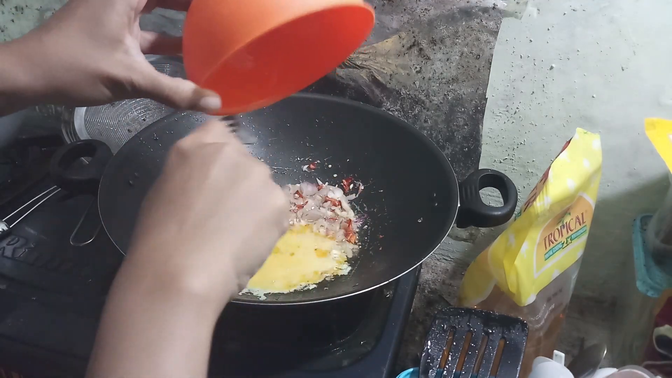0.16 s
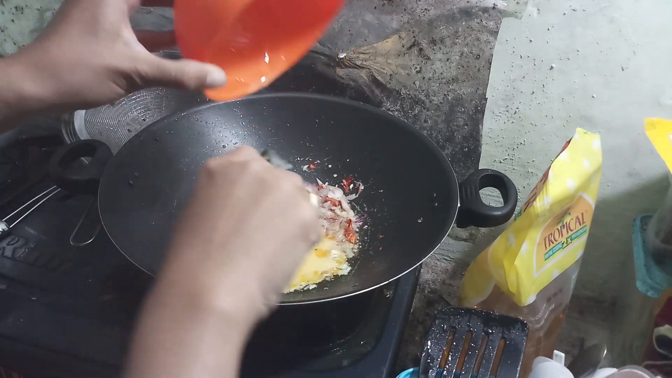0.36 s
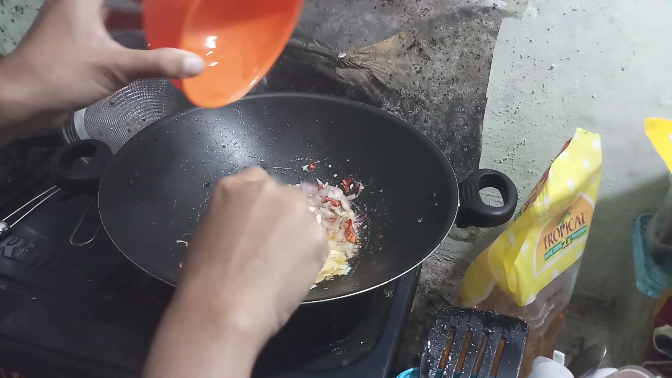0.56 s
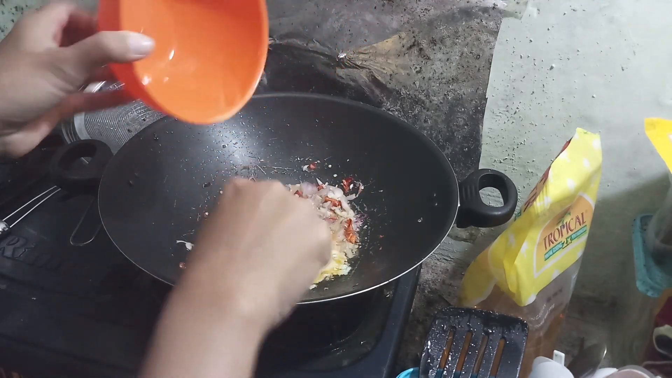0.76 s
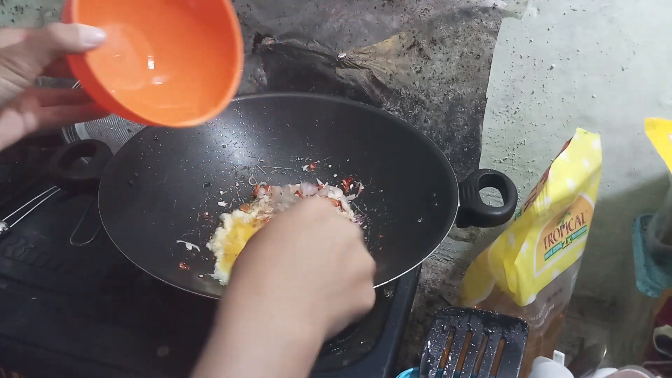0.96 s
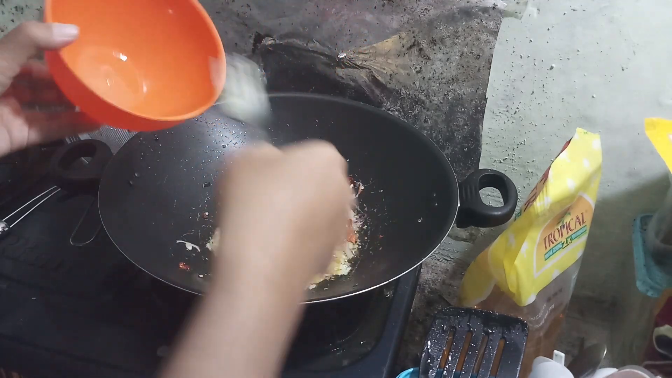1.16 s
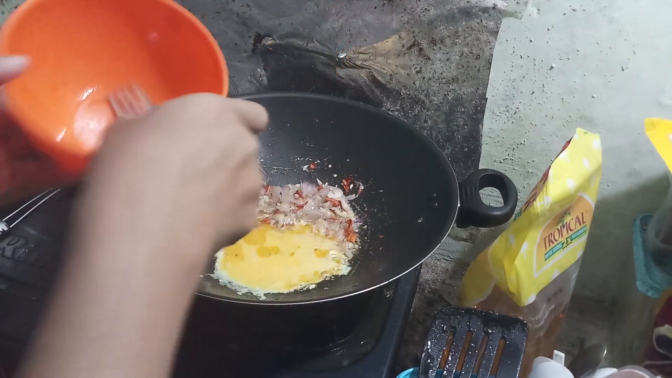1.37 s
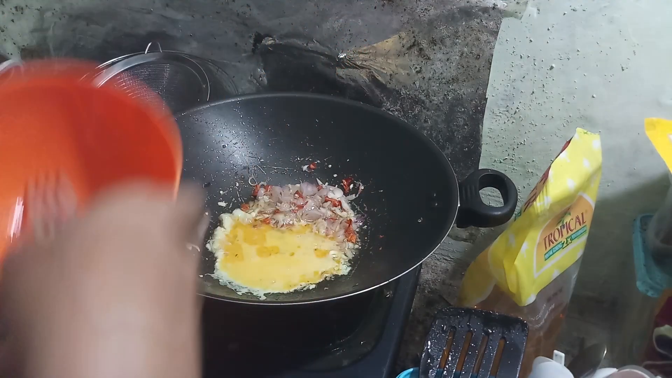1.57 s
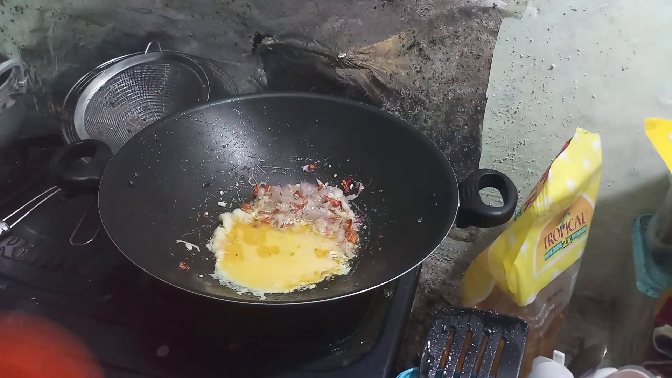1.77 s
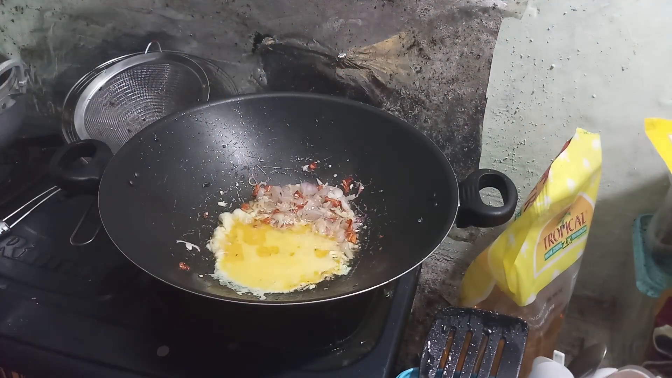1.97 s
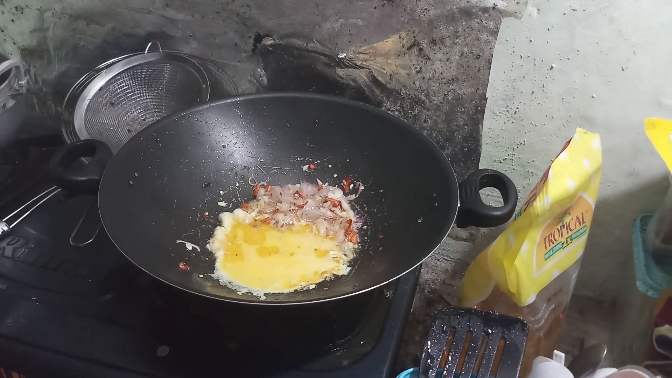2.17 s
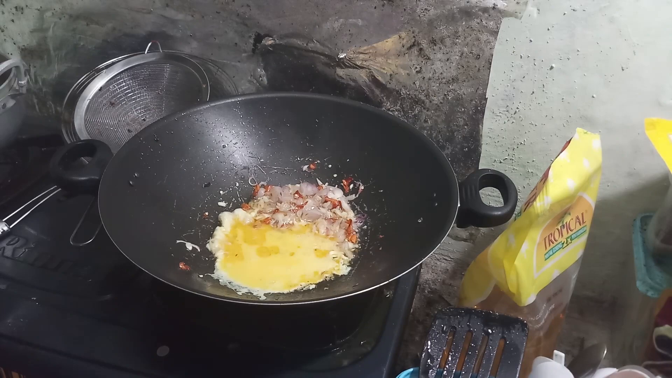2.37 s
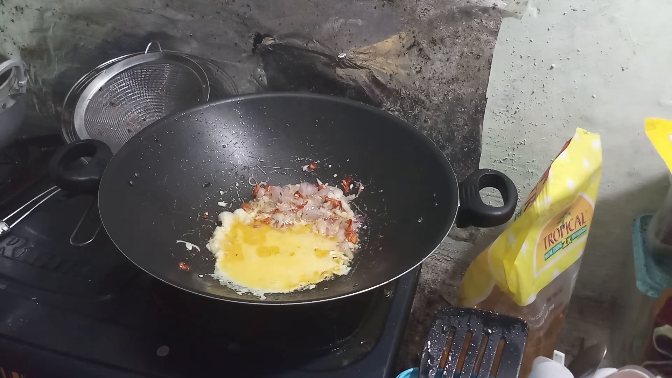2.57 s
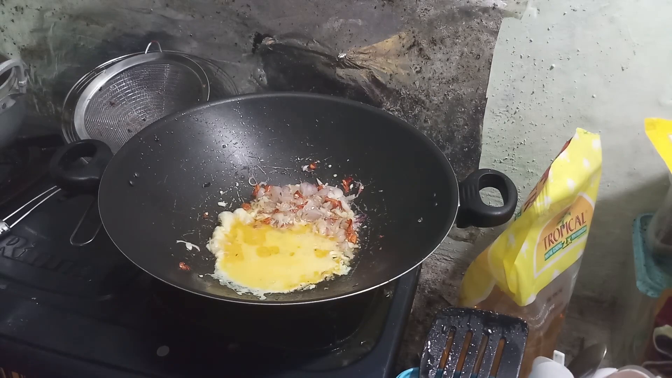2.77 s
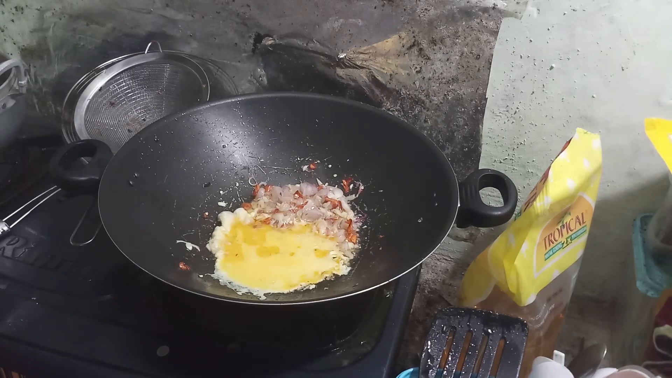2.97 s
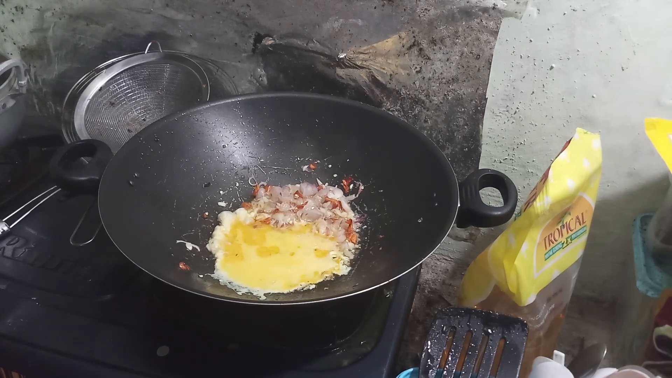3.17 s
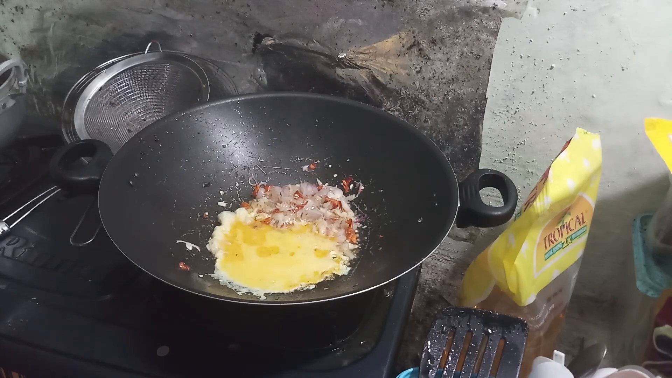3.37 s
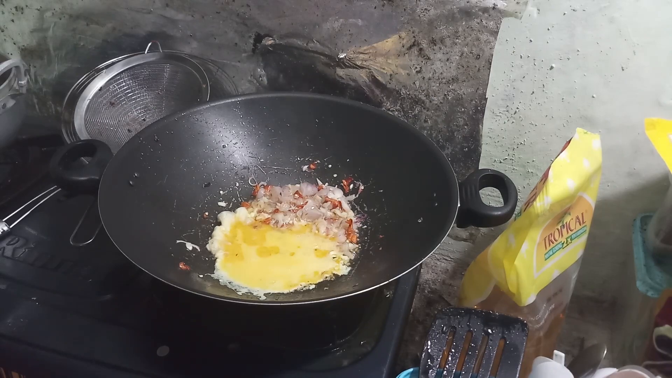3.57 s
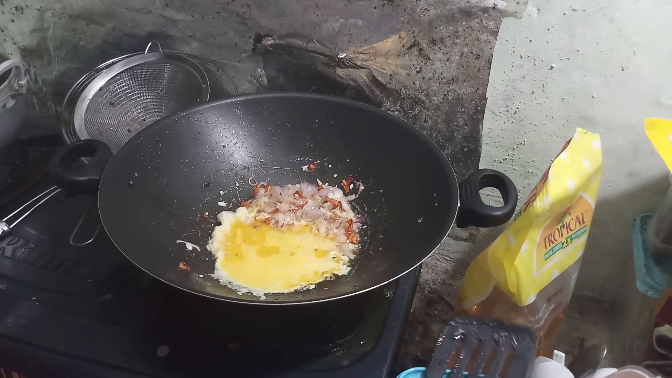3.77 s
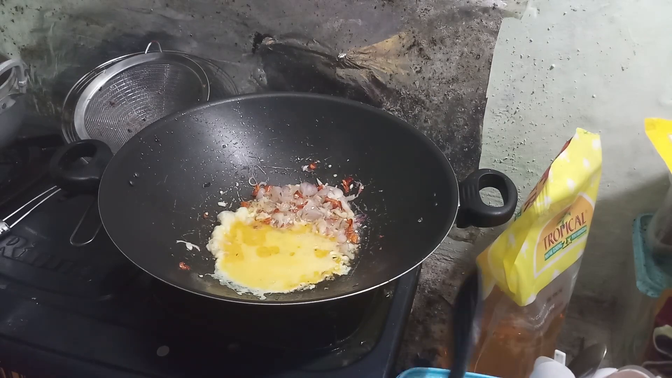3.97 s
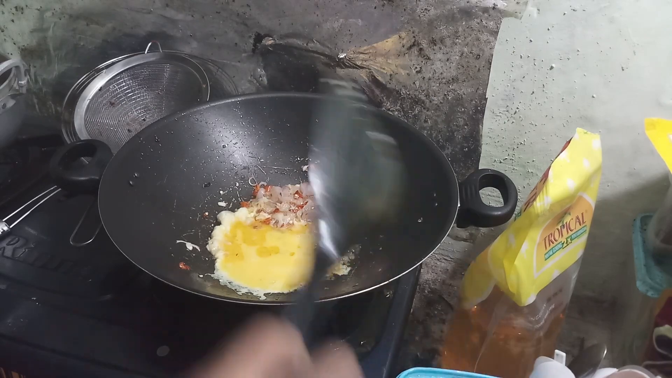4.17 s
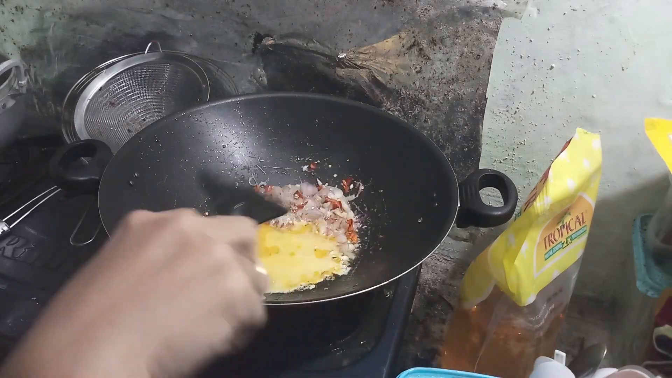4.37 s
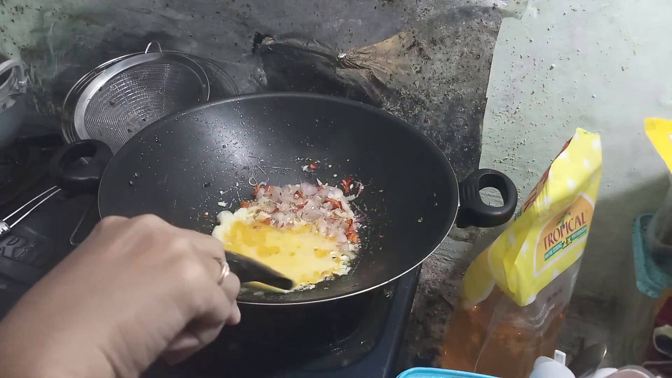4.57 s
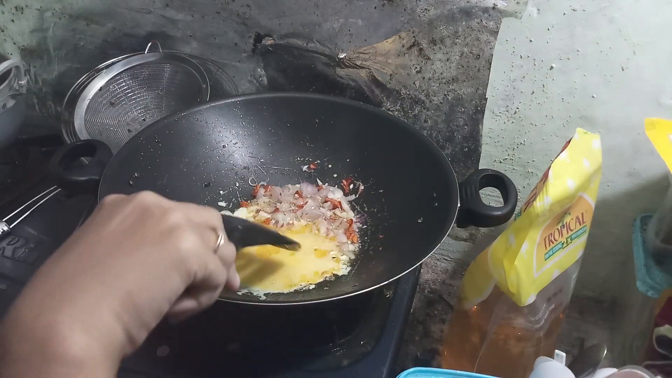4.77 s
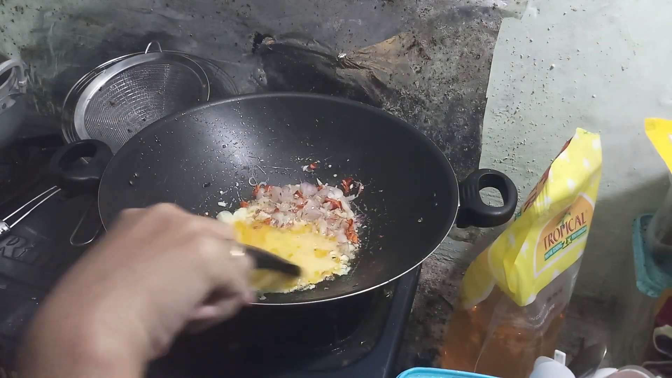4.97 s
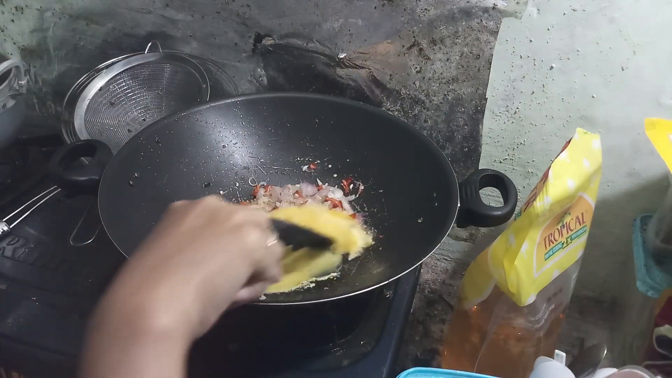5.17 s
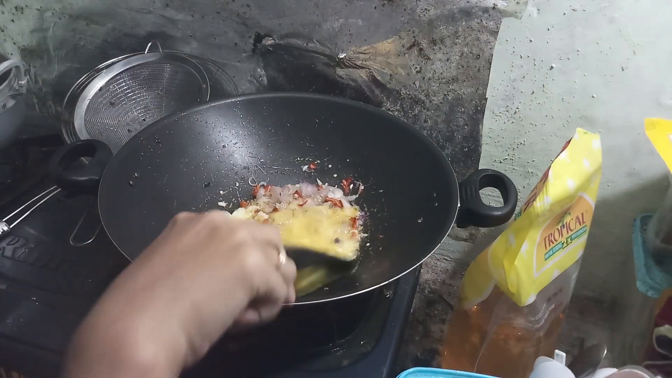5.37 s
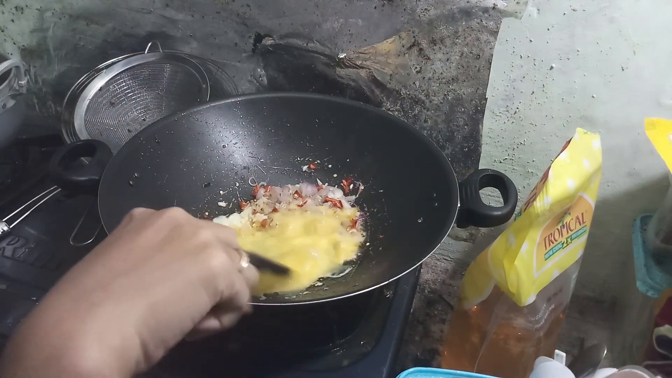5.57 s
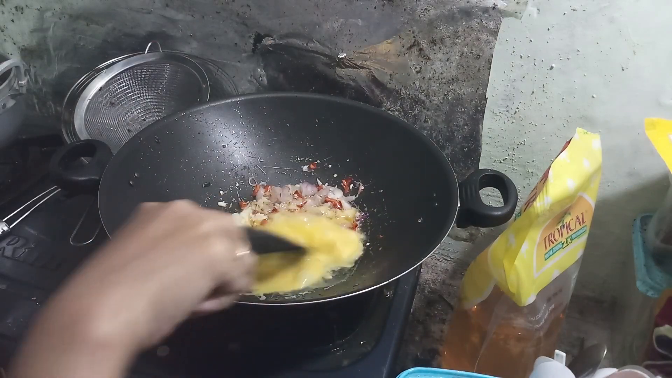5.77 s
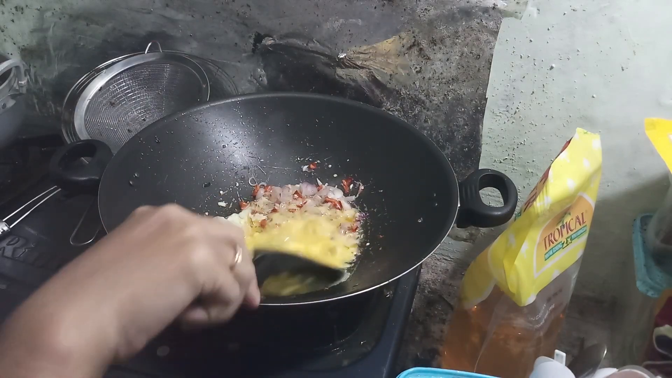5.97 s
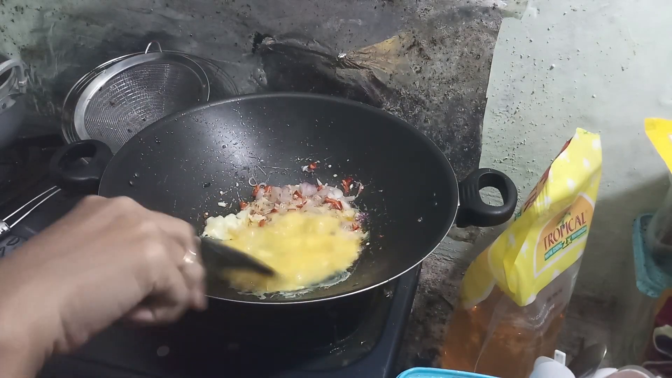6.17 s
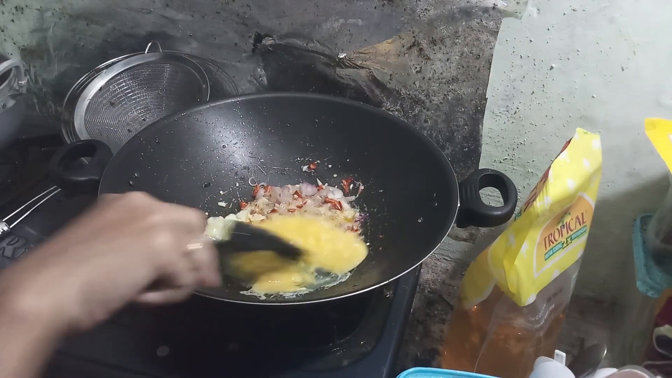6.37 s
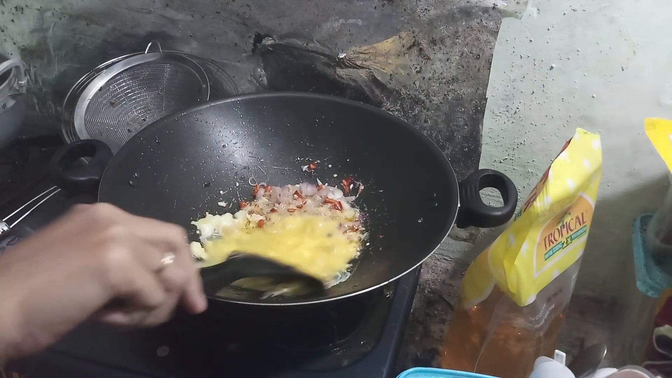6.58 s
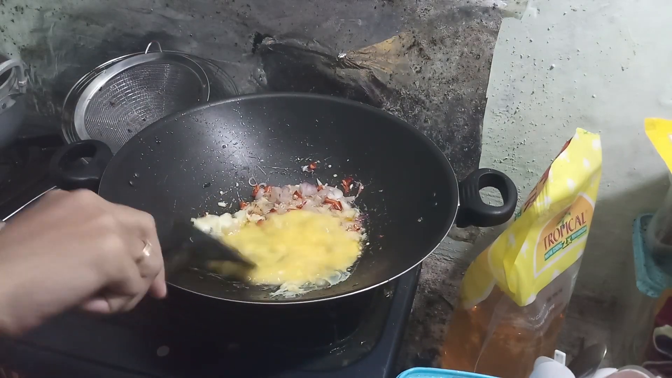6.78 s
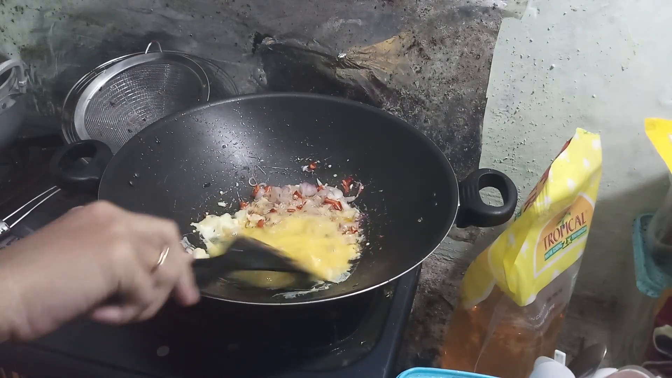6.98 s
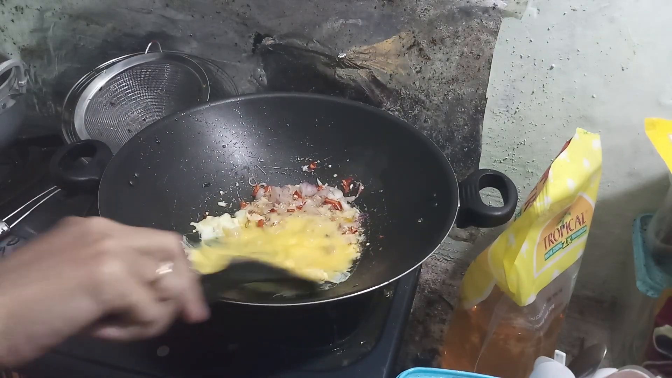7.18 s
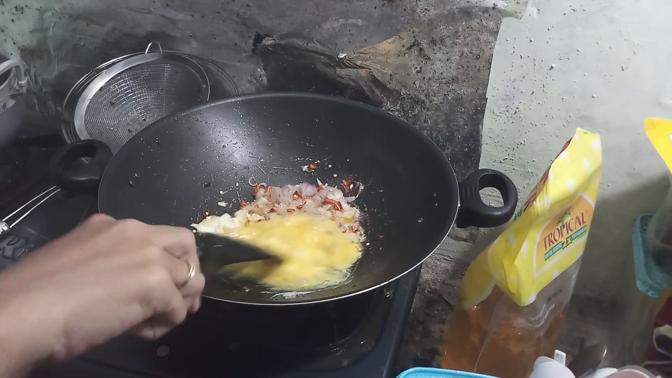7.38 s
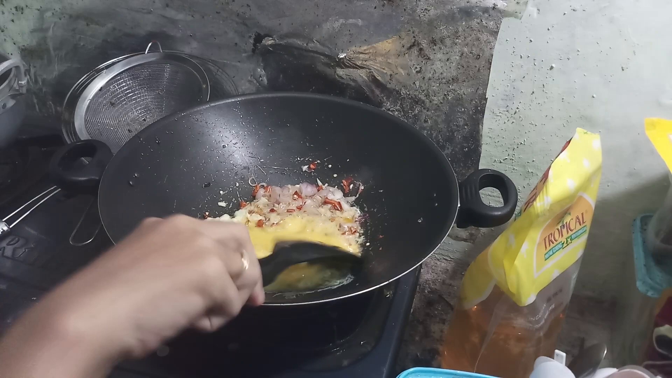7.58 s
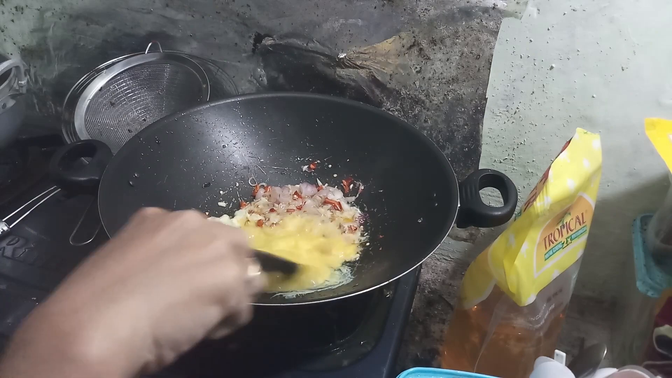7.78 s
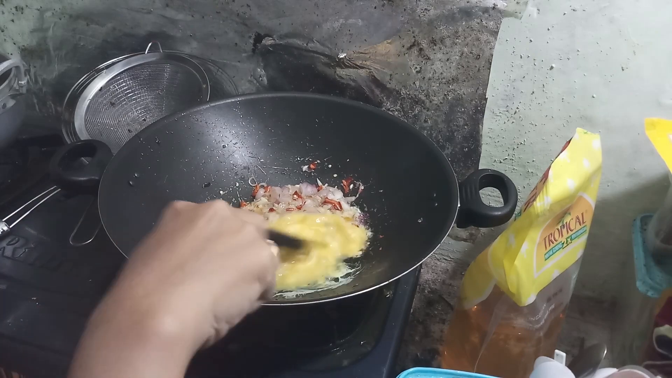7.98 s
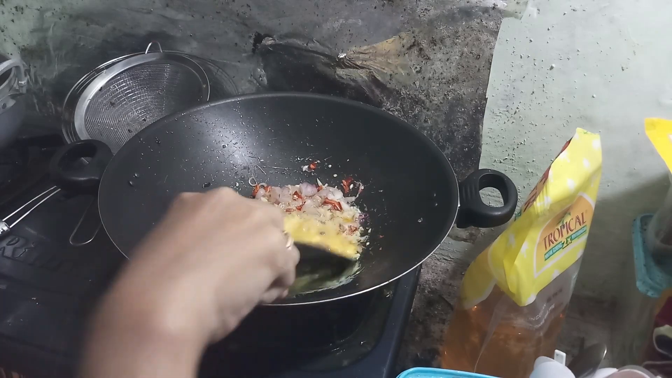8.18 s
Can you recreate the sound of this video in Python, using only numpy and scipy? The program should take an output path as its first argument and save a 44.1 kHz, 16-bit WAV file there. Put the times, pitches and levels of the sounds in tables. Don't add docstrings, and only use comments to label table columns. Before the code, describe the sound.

In a small hard-walled kitchen, egg fries in a wok with a soft steady sizzle, low flame rumble and sharp oil spits. A fork scrapes briefly in a plastic bowl, then drops in with a clatter. The bowl lands on the counter with a loud hollow knock. After a pause a spatula rattles off the stove and scrapes, knocks and ticks in the wok to the end. Close stereo microphones.

```python
import sys
import numpy as np
from scipy import signal
from scipy.fft import rfft, irfft
from scipy.io import wavfile
from scipy.ndimage import map_coordinates

SR = 44100
rng = np.random.default_rng(int(sys.argv[2]) if len(sys.argv) > 2 else 0)


def voltage_ratio(decibels):
    exponent = np.asarray(decibels, float) / 20
    return 10 ** exponent


def wrap_up_sound(samples):
    columns = np.atleast_2d(samples).T
    tamed = np.clip(columns, -1, 1)
    steps = np.round(tamed * 32767).astype(np.int16)
    wavfile.write(sys.argv[1], SR, steps)


N = 362502

# (time [s], fizz level [dB])
FRYING_VIGOUR = [(0.0, -52.5), (0.2, -52), (0.4, -55), (1.44, -53.5), (2.7, -54.5), (3.3, -57),
                 (4.23, -55.5), (5.56, -53), (6.52, -52.5), (7.53, -53.5), (8.22, -53.5)]
# (frequency [Hz], density [dB per Hz])
FIZZ_SPECTRUM = [(120, -48.5), (200, -5), (254, -14.5), (347, -2), (416, -9.5), (448, -8.5), (659, -5.5),
                 (883, -3.5), (1300, -1.5), (1420, -11.5), (1530, -9.5), (2090, 0.5), (7410, 0),
                 (14900, -6.5), (16000, -17)]
# (frequency [Hz], density [dB per Hz])
FLAME_SPECTRUM = [(15, -62.5), (25, -41), (40, -13), (64, -6.5), (97, -1.5), (115, -2.5), (135, -15),
                  (161, -10), (246, -36), (300, -21), (390, -70), (660, -120)]
# (frequency [Hz], width [Hz], level [dB])
WOK_HUM = [(361, 30, -6.5), (1279, 61, 11.5), (1540, 110, 10.5), (1864, 72, 9.5), (2250, 101, -12),
           (4180, 180, 7)]
FLAME_MEAN_DB, FLAME_DB_PER_FIZZ_DB = -56.5, 1

# (end time [s], peak level [dB], swell [dB/s])
FORK_STROKES = [
    (0.0, -38.5, 198),
    (0.167, -29.5, 220),
    (0.241, -22.5, 318),
]
# (time [s], peak level [dB])
FORK_CATCHES = [
    (0.104, -44),
    (0.126, -38),
    (0.154, -19),
    (0.224, -17),
    (0.235, -28),
    (0.248, -16),
    (0.26, -18),
    (0.269, -17.5),
    (0.273, -40),
]
# (frequency [Hz], width [Hz], level [dB])
BOWL_RESONANCES = [(543, 110, -5), (610, 55, 0), (900, 50, 2), (1127, 48, 1.5), (1275, 36, -2),
                   (1600, 220, -18), (2120, 650, -26), (4200, 1800, -32)]
FORK_FADE_DB_PER_S, BOWL_PAN_DB = 297, -1

# (start time [s], length [s], from pitch [Hz], to pitch [Hz], level [dB])
SQUEALS = [
    (0.101, 0.076, 1004, 1203, -46.5),
    (5.552, 0.082, 1850, 2760, -50),
    (5.758, 0.03, 2900, 2800, -54),
    (6.073, 0.024, 2100, 2210, -52),
    (6.287, 0.038, 1580, 1580, -54),
    (7.271, 0.062, 2950, 3060, -51.5),
    (7.337, 0.053, 5300, 4770, -49),
    (0.224, 0.068, 610, 580, -34),
    (6.98, 0.095, 4280, 4840, -52),
    (7.19, 0.04, 5080, 5310, -49),
]
SQUEAL_JITTER, SQUEAL_OCTAVE_DB = 0.0373, -8.5

# (time [s], peak level [dB], pitch [Hz], T60 [s])
OIL_SPITS = [(0.112, -39, 1250, 0.034), (0.3155, -55, 1290, 0.13), (1.136, -34, 5440, 0.091),
             (1.189, -34, 9000, 0.074), (2.2204, -25, 7900, 0.025), (2.876, -18.5, 12000, 0.04),
             (3.294, -34, 6220, 0.089), (3.4835, -38, 12700, 0.11), (3.6017, -27, 7650, 0.048),
             (3.868, -25, 4640, 0.027), (3.8690, -34.5, 2000, 0.03), (4.185, -29, 12600, 0.043),
             (4.267, -31, 9970, 0.059), (4.365, -30.5, 7000, 0.051), (4.6755, -31, 3940, 0.086),
             (4.995, -32.5, 5030, 0.16), (5.017, -31.5, 1430, 0.066), (6.124, -27.5, 3780, 0.056),
             (7.192, -31, 1540, 0.043), (7.6575, -19, 5140, 0.11), (8.1, -37, 1454, 0.066),
             (8.1764, -28, 2630, 0.058)]
# (time [s], peak level [dB], pitch [Hz])
FINE_SPITS = [(2.2197, -38, 13600), (3.6007, -33, 14000), (4.2547, -32, 10700), (5.246, -32, 11800),
              (8.176, -26, 9380), (0.3147, -30, 8600), (0.4025, -30.5, 12000), (2.149, -43, 7960),
              (5.736, -27.5, 6400), (6.13, -37, 13000), (7.658, -35, 8800)]
FINE_SPIT_T60_S = 0.045

# (time [s], peak level [dB])
FORK_DROP_HITS = [(1.4768, -12), (1.4795, -10.5), (1.4848, -12.5), (1.489, -18), (1.502, -20), (1.511, -19),
                  (1.521, -35), (1.567, -27.5), (1.579, -27.5), (1.593, -31.5), (1.604, -30)]
# (frequency [Hz], level [dB], T60 [s])
FORK_MODES = [(350, -16, 0.51), (920, -6.5, 0.19), (1070, -8, 0.18), (1308, -1, 0.18), (2250, 0, 0.071),
              (2320, -13, 0.12), (3240, -6, 0.12), (3720, -6, 0.088), (3890, -5, 0.11), (3900, -12, 0.15),
              (4500, -16, 0.14), (5959, -12, 0.071), (6440, 0, 0.05), (7650, -12, 0.05)]
# (frequency [Hz], density [dB per Hz])
FORK_CRACK = [(180, -53), (300, -5), (737, -13), (885, -2), (1140, -15), (1280, 11), (1430, -5.5),
              (2250, 0.5), (3030, -4), (3890, 0), (5080, -7), (7500, -8.5), (16000, -18.5)]

# (time [s], peak level [dB])
LANDING_HITS = [
    (2.8148, 1.5),
    (2.8176, -2),
    (2.826, -8),
    (2.837, -11),
    (2.855, -10),
    (2.876, -24),
    (2.908, -35.5),
    (3.004, -34),
    (3.011, -23.5),
]
# (frequency [Hz], level [dB], T60 [s])
LANDING_MODES = [(325.7, -9, 0.43), (535, -6.5, 0.3), (610, -2, 0.4), (790, 2.5, 0.15), (844, -3.5, 0.14),
                 (930, -5, 0.56), (1270, -5.5, 0.33), (1700, 0, 0.16), (2035, -16.5, 0.15),
                 (2410, -0.5, 0.13), (3420, -4.5, 0.12), (4016, -1.5, 0.15), (4840, -12, 0.1),
                 (5670, -4, 0.07)]
# (frequency [Hz], density [dB per Hz])
LANDING_CRACK = [(80, -31), (200, -17), (482, -15.5), (629, -13.5), (702, -16), (802, -7.5), (1120, -13.5),
                 (1220, -14), (2780, -23.5), (5520, -20), (16000, -38.5)]

# (time [s], peak level [dB])
LIFT_HITS = [
    (3.869, -26),
    (3.882, -33),
    (3.893, -34),
    (3.908, -43),
    (3.924, -35),
]
# (frequency [Hz], level [dB], T60 [s])
STOVE_MODES = [(128, -1.5, 0.76), (183, -3, 0.44), (345, -7, 0.45), (479, -22, 0.76), (727, -19, 0.56),
               (1281, -28, 0.17)]
# (frequency [Hz], density [dB per Hz])
STOVE_CRACK = [(35, -39), (60, 9), (188, -4.5), (324, -3), (549, -13), (643, -11), (1130, -28),
               (4000, -35.5), (5200, -68)]

# (start time [s], length [s], press level [dB], wall over bottom [dB])
FLAT_STROKES = [(5.19, 0.097, -46.5, -4.5), (5.33, 0.35, -51, 2), (5.55, 0.097, -47.5, -3.5),
                (5.66, 0.19, -53, -2), (5.832, 0.08, -42, -5.5), (5.95, 0.073, -49.5, -3.5),
                (6.07, 0.036, -60, -5), (6.14, 0.17, -47, -1.5), (6.365, 0.15, -42, -7),
                (6.55, 0.073, -53, 4.5), (6.63, 0.065, -48.5, -13), (6.692, 0.034, -38, -13),
                (6.74, .17, -46, -0.5), (6.94, 0.083, -61, 10), (7.014, 0.069, -38.5, -5.5),
                (7.08, 0.15, -46.5, -4), (7.325, 0.15, -46.5, -2), (7.51, 0.025, -48.5, 3),
                (7.575, 0.018, -56.5, 11), (7.65, 0.13, -45, -3.5), (7.836, 0.13, -50.5, 2.5),
                (7.965, 0.14, -43.5, -3), (8.12, 0.096, -47.5, -1)]
# (start time [s], length [s], bite level [dB], squeak over chatter [dB])
EDGE_BITES = [(5.245, 0.14, -50, 2.5), (5.55, 0.16, -51, 4), (5.755, 0.059, -48.5, 1.5),
              (5.832, 0.13, -49, -1.5), (6.065, 0.03, -48, -11), (6.18, 0.21, -50.5, 1),
              (6.37, 0.12, -50.5, -11), (6.49, 0.15, -50.5, 3.5), (6.64, .1, -54.5, 2),
              (6.82, 0.078, -50.5, 1), (6.97, 0.083, -48.5, -1.5), (7.13, 0.23, -50.5, -2),
              (7.31, 0.075, -47.5, 4), (7.51, 0.016, -53, -15), (7.575, 0.081, -49, -17),
              (7.65, 0.13, -47.5, 1), (7.836, 0.089, -53, 1), (7.962, 0.12, -51.5, 5),
              (8.1, 0.11, -48.5, 0)]
# (frequency [Hz], width [Hz], level [dB])
WOK_BOTTOM = [(185, 72, -6.5), (286.8, 18, 4.5), (345, 36.4, 6), (479.5, 29, -3)]
# (frequency [Hz], width [Hz], level [dB])
WOK_WALL = [(540, 20, -3), (644, 66, -2.5), (803, 24, -2), (940, 45, -0.5), (1000, 410, -11)]
# (frequency [Hz], width [Hz], level [dB])
BLADE_RESONANCES = [(1250, 91, 6), (1531, 19, 10), (1713, 115, 0.5), (2250, 230, 6), (2420, 420, 2.5),
                    (3030, 390, -5)]
# (frequency [Hz], width [Hz], level [dB])
EDGE_RESONANCES = [(4400, 950, 0), (5260, 210, 5), (6300, 740, -5)]
STIR_START_S, STROKE_RISE_S, STROKE_LIFT_S = 5.17, 0.0044, 0.021
PRESS_SAG_DB_PER_S, BITE_SAG_DB_PER_S = 21, 38
GLIDE_PRESS_DB, GLIDE_BITE_DB = -57, -62

# (time [s], peak level [dB], pitch [Hz])
BLADE_KNOCKS = [(5.17, -38, 790), (5.244, -28.5, 1540), (5.403, -29.5, 970), (5.454, -28, 523),
                (5.508, -33, 720), (5.547, -27.5, 990), (5.755, -29.5, 2820), (5.83, -27.5, 800),
                (5.846, -29, 630), (5.858, -35, 900), (5.96, -27.5, 895), (6.067, -33, 1020),
                (6.221, -36, 1270), (6.241, -23.5, 700), (6.249, -33, 900), (6.378, -30, 517),
                (6.558, -27, 810), (6.735, -32, 570), (6.941, -32, 980), (7.188, -35, 770),
                (7.509, -30.5, 800), (7.578, -34, 1500), (7.64, -36, 770), (7.657, -32.5, 510),
                (7.658, -26.5, 1250), (7.707, -30.5, 740), (7.836, -29, 870), (7.888, -33, 640),
                (7.963, -31.5, 1180), (8.139, -28.5, 880)]
# (time [s], peak level [dB], pitch [Hz])
FLAT_THUMPS = [
    (5.222, -31.5, 382),
    (5.837, -34, 296),
    (6.368, -36, 293),
    (6.486, -46, 350),
    (6.635, -34, 328),
    (6.698, -30.5, 347),
    (7.024, -30, 345),
    (7.329, -32.5, 345),
    (8.026, -28, 343),
]
# (time [s], peak level [dB], pitch [Hz], T60 [s])
CORNER_TICKS = [
    (5.273, -29.5, 2280, 0.11),
    (5.5623, -29, 1880, 0.14),
    (6.248, -29, 4480, 0.03),
    (6.4973, -43, 4400, 0.11),
    (6.556, -37, 5300, 0.08),
    (7.657, -21, 4400, 0.05),
    (7.66, -27, 5800, 0.086),
    (7.9633, -33, 2250, 0.059),
]
KNOCK_T60_S, THUMP_T60_S, THUMP_PAN_DB = 0.085, 0.1, -1.5

# (frequency [Hz], T60 [s])
KITCHEN_T60 = [(100, 0.52), (500, 0.24), (2000, 0.21), (6000, 0.13), (14000, 0.18)]
# (frequency [Hz], left minus right [dB])
MIC_BALANCE = [(60, 1.5), (110, 0.5), (200, -3.5), (380, -5), (700, 5.5), (1290, 0.5), (2380, 1.5),
               (4400, 1.5), (8120, -1.5), (15000, 3.5)]
SHARED_HZ = 524
TOP_CUT_HZ = 15850


def rms_one(x):
    return x / np.sqrt(np.mean(x ** 2) + 1e-20)


def in_time(rows):
    s, *columns = np.transpose(rows)
    return [np.interp(np.arange(N) / SR, s, c) for c in columns]


def at_hz(points, hz):
    table_hz, value = np.transpose(points)
    return np.interp(np.log(hz + 1), np.log(table_hz), value)


def colour(x, points):
    size = 4096
    level_db = at_hz(points, np.linspace(0, SR / 2, size // 2 + 1))
    cepstrum = irfft(np.log(voltage_ratio(level_db)))
    cepstrum[1:size // 2] *= 2
    cepstrum[size // 2 + 1:] = 0
    response = irfft(np.exp(rfft(cepstrum)))
    return signal.oaconvolve(np.atleast_2d(x), response[None], axes=-1)[:, :np.shape(x)[-1]]


def drift(rate_hz):
    knots = rng.standard_normal(400)
    return map_coordinates(knots, [np.arange(N) / SR * rate_hz % 399], order=3)


def decay(x, t60_s, gain=1):
    return signal.lfilter([gain], [1, -voltage_ratio(-60 / (t60_s * SR))], x)


def resonate(x, peaks):
    out = 0
    for k, (hz, width_hz, level_db) in enumerate(peaks):
        r = np.exp(-np.pi * width_hz / SR)
        a = [1, -2 * r * np.cos(2 * np.pi * hz / SR), r * r]
        b = [(1 - r * r) / 2, 0, (r * r - 1) / 2]
        out = out + (-1) ** k * voltage_ratio(level_db) * signal.lfilter(b, a, x)
    return out


def grains(per_s, spread_db, channels):
    sizes = voltage_ratio(spread_db * np.minimum(rng.exponential(1, (channels, N)), 5))
    sizes = sizes * rng.choice([-1, 1], (channels, N))
    return sizes * (rng.random((channels, N)) < per_s / SR) + 1e-18


def two_ears(shared, own):
    low = signal.sosfilt(signal.butter(2, SHARED_HZ, fs=SR, output="sos"), shared)
    return low + signal.sosfilt(signal.butter(2, SHARED_HZ, "high", fs=SR, output="sos"), own)


def pan(pan_db):
    return voltage_ratio(np.array([[pan_db], [-pan_db]]) / 2)


def frying():
    fizz_db, = in_time(FRYING_VIGOUR)
    flame_db = FLAME_MEAN_DB + FLAME_DB_PER_FIZZ_DB * (fizz_db - fizz_db.mean())
    bursts = rms_one(grains(7000 * voltage_ratio(4.6 * drift(30)), spread_db=5.5, channels=3))
    bursts = bursts + voltage_ratio(3.0) * rng.standard_normal((3, N))
    bursts = two_ears(bursts[0], bursts[1:])
    fizz = rms_one(colour(bursts + resonate(bursts, WOK_HUM), FIZZ_SPECTRUM[:-1]))
    flame = rms_one(colour(rng.standard_normal(N), FLAME_SPECTRUM))
    flicker_db = 0.5 * drift(25)
    return voltage_ratio(fizz_db + 6 + flicker_db) * fizz + voltage_ratio(flame_db + 1.2 * drift(6.5)) * flame


def fork_on_bowl():
    t = np.arange(N) / SR
    stroke_db = np.full(N, -120.0)
    for end_s, db, swell in FORK_STROKES:
        fall_db = np.maximum(swell * (end_s - t), FORK_FADE_DB_PER_S * (t - end_s))
        stroke_db = np.maximum(stroke_db, db - fall_db)
    catches = np.full(N, 1e-18)
    catches[[round(s * SR) for s, db in FORK_CATCHES]] = voltage_ratio(np.array(FORK_CATCHES)[:, 1] - 15.0)
    force = voltage_ratio(stroke_db - 10.5) + decay(catches, 0.032)
    rubbing = rms_one(grains(5000, spread_db=1.5, channels=1)[0])
    return resonate(force * rubbing, BOWL_RESONANCES) * voltage_ratio(20.5) * pan(BOWL_PAN_DB)


def squeals():
    out, t = np.zeros(N + SR), np.arange(SR // 5) / SR
    wobble = signal.lfilter([1], [1, -0.99], rng.standard_normal((len(SQUEALS), 2, len(t))))
    for (s, length_s, from_hz, to_hz, level_db), (pitch, flutter) in zip(SQUEALS, wobble):
        gone = np.clip(t / length_s, 0, 1)
        hz = (from_hz + (to_hz - from_hz) * gone) * (1 + SQUEAL_JITTER * rms_one(pitch))
        phase = 2 * np.pi * np.cumsum(hz) / SR
        tone = np.sin(phase) + voltage_ratio(SQUEAL_OCTAVE_DB) * np.sin(2 * phase)
        envelope = voltage_ratio(level_db + 3.0 * rms_one(flutter)) * np.sqrt(np.abs(np.sin(np.pi * gone)))
        at = round(s * SR)
        out[at:at + len(t)] += envelope * tone
    return out[:N]


def puffs(events, sharpness, crack_db, snap_db):
    out, t = np.zeros((2, N + SR)), np.arange(SR // 5) / SR
    noise = rng.standard_normal((len(events), len(t)))
    for (s, peak_db, hz, t60_s, pan_db), puff in zip(events, noise):
        puff = puff * (voltage_ratio(-60 * t / max(t60_s, 0.005)) + voltage_ratio(snap_db - 60 * t / 0.0036))
        ring = resonate(puff, [(hz, hz / sharpness, 0)]) * np.sqrt(sharpness)
        puff = ring + resonate(puff, [(hz, 1.3 * hz, crack_db)])
        at = round(s * SR)
        out[:, at:at + len(t)] += voltage_ratio(peak_db - 3.5) * pan(pan_db) * puff / abs(puff).max()
    return out[:, :N]


def crackle(count):
    when, size, pitch, ring, place = rng.random((5, count))
    return np.transpose([when * N / SR, -45 + 6 * size ** 2, 2500 * voltage_ratio(21 * pitch),
                         0.03 + 0.048 * ring, 8 * (place - 0.5)])


def oil_spits():
    fine = [(*row, FINE_SPIT_T60_S) for row in FINE_SPITS]
    spits = puffs([(*row, 0) for row in [*OIL_SPITS, *fine]], sharpness=4.5, crack_db=-4, snap_db=6)
    return spits + puffs(crackle(count=110), sharpness=7.5, crack_db=4.5, snap_db=-8.5)


def struck(hits, modes, crack, ring_db, crack_db, crack_t60, damping, shake_db, shake_t60, click):
    at, hit_db = [round(s * SR) for s, db in hits], np.array(hits)[:, 1]
    out, pulse = np.zeros(N), np.full(N, 1e-18)
    chance = rng.normal(0, 3, (len(hits), len(modes)))
    for (hz, level_db, t60_s), luck_db in zip(modes, chance.T):
        clicks = np.full(N, 1e-18)
        clicks[at] = voltage_ratio(hit_db + level_db + ring_db + luck_db)
        r = voltage_ratio(-60 / (min(t60_s, 0.4) * damping * SR))
        w = 2 * np.pi * hz / SR
        out += signal.lfilter([0, np.sin(w)], [1, -2 * r * np.cos(w), r * r], clicks)
    pulse[at] = voltage_ratio(hit_db + crack_db)
    rattle = decay(pulse, crack_t60)
    shake = decay(pulse, shake_t60, voltage_ratio(shake_db))
    noise = rng.standard_normal(N)
    dull = signal.lfilter([0.6], [1, -0.5], noise)
    return out + colour(rattle * noise + shake * dull + click * pulse, crack)[0]


def fork_drop():
    return struck(FORK_DROP_HITS, FORK_MODES, FORK_CRACK, ring_db=-15.5, crack_db=-2.5, crack_t60=0.019,
                  damping=0.41, shake_db=-35, shake_t60=0.54, click=1.5)


def bowl_landing():
    return struck(LANDING_HITS, LANDING_MODES, LANDING_CRACK, ring_db=-24, crack_db=4.5, crack_t60=0.028,
                  damping=0.35, shake_db=-17, shake_t60=0.3, click=7.0)


def spatula_lift():
    return struck(LIFT_HITS, STOVE_MODES, STOVE_CRACK, ring_db=-15.0, crack_db=10.5, crack_t60=0.038,
                  damping=0.43, shake_db=-13, shake_t60=0.18, click=6.0)


def strokes(rows, sag_db_per_s, glide_db):
    t = np.arange(N) / SR
    out = voltage_ratio(glide_db) * np.clip((t - STIR_START_S) / STROKE_LIFT_S, 0, 1) * np.ones((2, 1))
    for s, length_s, level_db, lean_db in rows:
        rise = (t - s) / STROKE_RISE_S
        lift = 1 + (s + length_s - t) / STROKE_LIFT_S
        shape = np.clip(np.minimum(rise, lift), 0, 1)
        shape = shape * voltage_ratio(level_db - sag_db_per_s * np.clip(t - s, 0, 1))
        out = np.maximum(out, shape * voltage_ratio(np.array([[0], [lean_db]])))
    return out


def spatula_scrape():
    on_bottom, on_wall = strokes(FLAT_STROKES, PRESS_SAG_DB_PER_S, GLIDE_PRESS_DB)
    chatter, squeak = strokes(EDGE_BITES, BITE_SAG_DB_PER_S, GLIDE_BITE_DB)
    slips = grains(1200 * voltage_ratio(4.0 * drift(35)), spread_db=4.0, channels=3)
    bottom = rms_one(resonate(slips[0], WOK_BOTTOM))
    wall = rms_one(resonate(slips[1], WOK_WALL))
    blade = rms_one(resonate(slips[1] + slips[2], BLADE_RESONANCES))
    edge = rms_one(resonate(grains(4900, spread_db=4.0, channels=1)[0], EDGE_RESONANCES))
    return voltage_ratio(-1.5) * (on_bottom * bottom + on_wall * wall + chatter * blade + squeak * edge)


def spatula_knocks():
    knocks = [(*row, KNOCK_T60_S, 0) for row in BLADE_KNOCKS]
    ticks = [(*row, 0) for row in CORNER_TICKS]
    thumps = [(*row, THUMP_T60_S, THUMP_PAN_DB) for row in FLAT_THUMPS]
    out = puffs(knocks, sharpness=7.0, crack_db=-10, snap_db=6)
    out = out + puffs(ticks, sharpness=13.0, crack_db=-14, snap_db=-7)
    return out + puffs(thumps, sharpness=14.0, crack_db=-18, snap_db=12)


def kitchen(x, near_db, wet_db):
    t = np.arange(SR // 2) / SR
    white = rng.standard_normal((4, len(t)))
    walls = two_ears(white[0], white[1:3])
    tail, edges_hz = 0, 80 * 2. ** np.arange(8.5)
    for low, high in zip(edges_hz, np.minimum(edges_hz[1:], 0.45 * SR)):
        band = signal.sosfilt(signal.butter(2, [low, high], "band", fs=SR, output="sos"), walls)
        tail = tail + band * voltage_ratio(-60 * t / at_hz(KITCHEN_T60, np.sqrt(low * high)))
    near = white[3] * voltage_ratio(-60 * t / 0.02)
    near = two_ears(0 * t, two_ears(0 * t, near)) * [[1], [-1]]
    echo = voltage_ratio(wet_db) * rms_one(tail * np.minimum(t / 0.0016, 1)) + voltage_ratio(near_db) * rms_one(near)
    echo = echo / np.sqrt(len(t))
    echo[:, 0] += 1
    heard = signal.oaconvolve(np.atleast_2d(x), echo, axes=-1)[:, :N]
    return signal.sosfilt(signal.butter(3, 120, "high", fs=SR, output="sos"), heard)


def scene():
    hands = kitchen(fork_on_bowl() + fork_drop(), near_db=5.0, wet_db=-4.0)
    counter = kitchen(bowl_landing() + spatula_lift(), near_db=-1.0, wet_db=-3.5)
    in_wok = squeals() + oil_spits() + spatula_scrape() + spatula_knocks()
    wok = kitchen(in_wok, near_db=0.0, wet_db=-1.0)
    return frying() + hands + counter + wok


def band_limit(x):
    return signal.sosfilt(signal.butter(12, 16820, fs=SR, output="sos"), x)


def record(dry):
    left = colour(dry[0], [(hz, db / 2) for hz, db in MIC_BALANCE])
    late = signal.lfilter([0, 0, 1], 1, dry[1])
    right = colour(late, [(hz, -db / 2) for hz, db in MIC_BALANCE])
    top_cut = signal.ellip(14, 0.3, 90, TOP_CUT_HZ, fs=SR, output="sos")
    return band_limit(signal.sosfilt(top_cut, np.vstack([left, right])))


dry = scene()
out = record(dry)
wrap_up_sound(out)
```